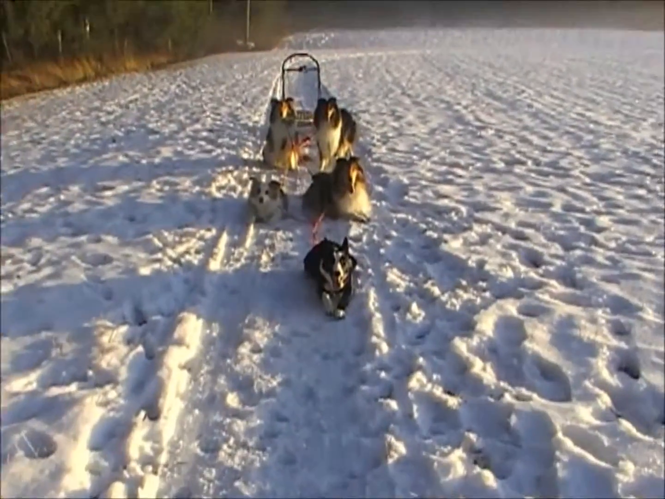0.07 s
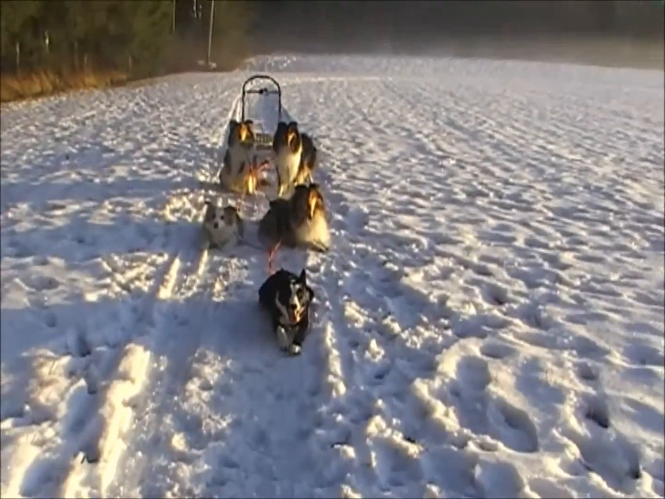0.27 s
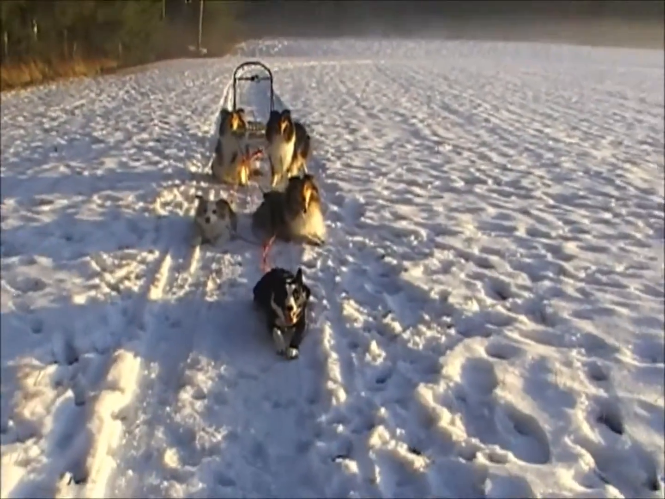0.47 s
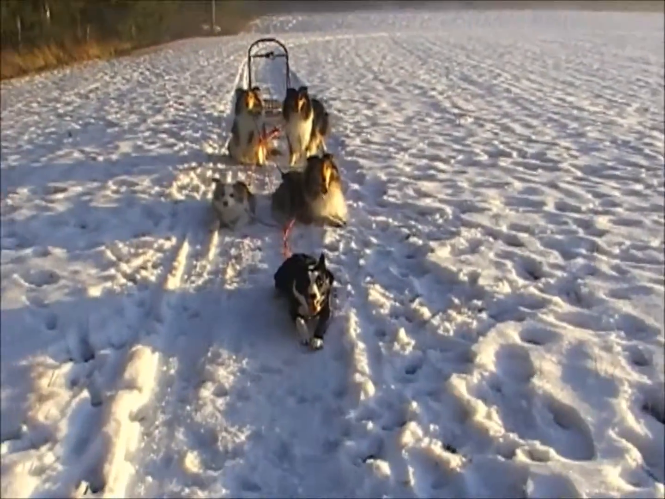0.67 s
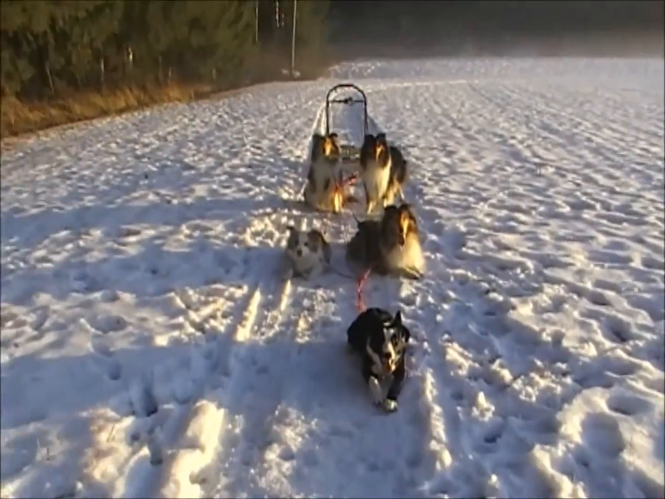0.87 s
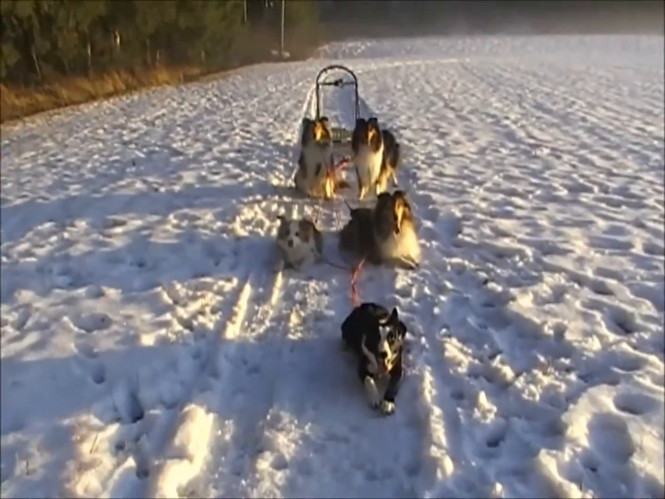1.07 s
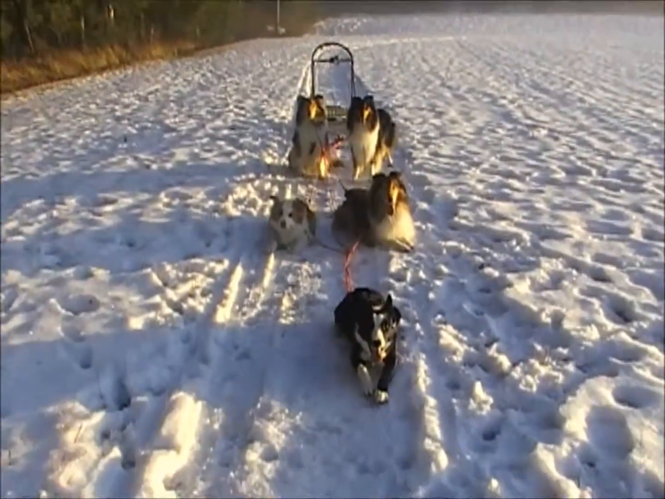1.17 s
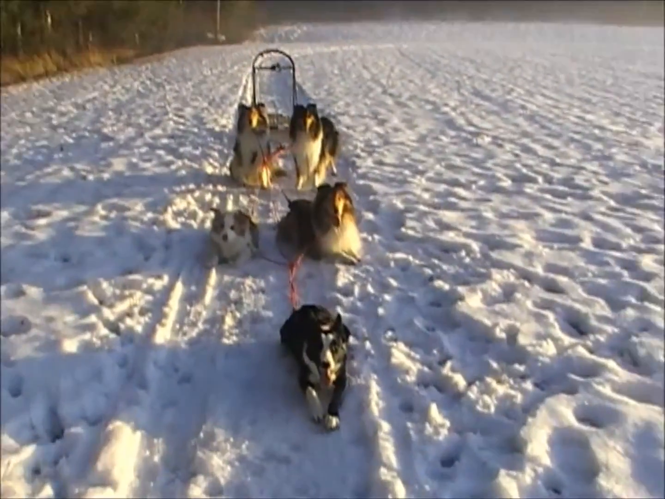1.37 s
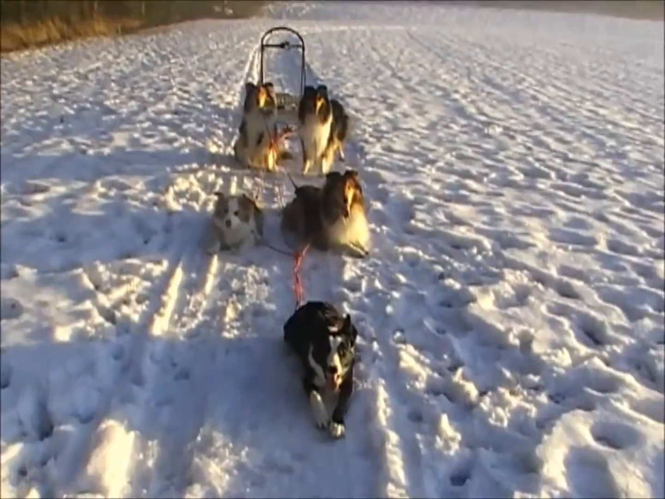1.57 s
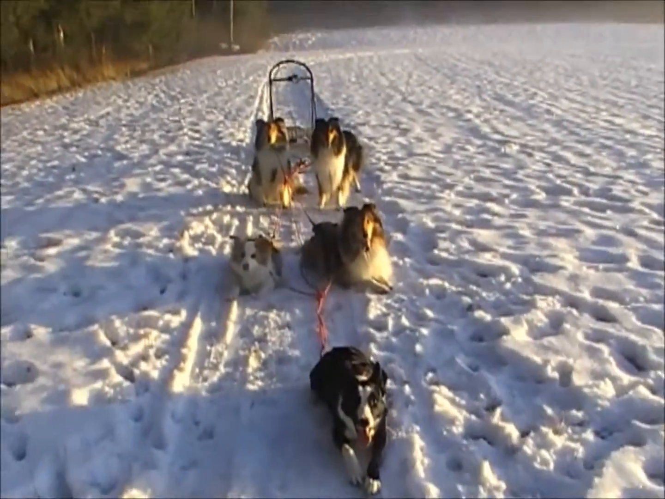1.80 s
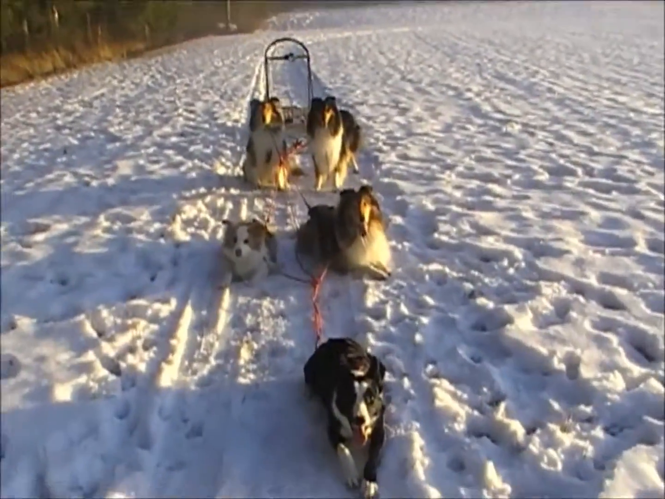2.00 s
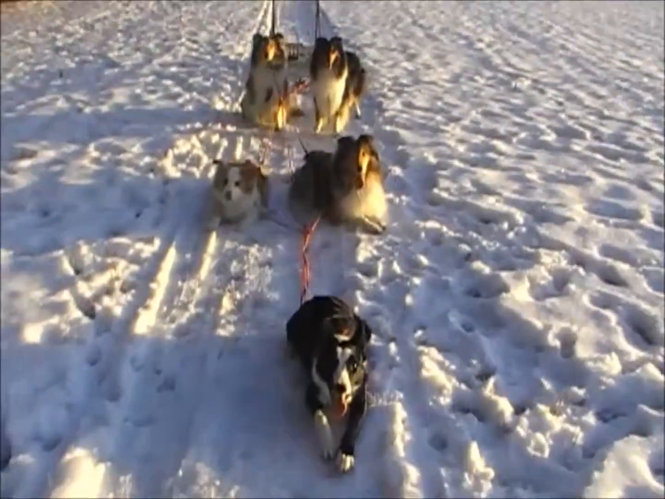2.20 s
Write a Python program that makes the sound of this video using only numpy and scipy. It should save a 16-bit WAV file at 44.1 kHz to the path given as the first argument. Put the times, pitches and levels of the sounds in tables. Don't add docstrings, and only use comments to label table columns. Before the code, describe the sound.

Crisp, crackling footsteps on frozen snow, with sharp plastic clicks and strap rubbing close to the microphone.

```python
import sys
import numpy as np
from scipy import signal
from scipy.fft import rfft, irfft, next_fast_len
from scipy.io import wavfile
from scipy.ndimage import map_coordinates

SR = 44100
rng = np.random.default_rng(int(sys.argv[2]) if len(sys.argv) > 2 else 0)


def voltage_ratio(level):
    return 10 ** (np.asarray(level, float) / 20)


def transcribe(u):
    v = np.clip(np.atleast_2d(u).T, -1, 1)
    q = np.round(v * 32767).astype(np.int16)
    wavfile.write(sys.argv[1], SR, q)


N = 99180
SIDE = np.array([[1.0], [-1.0]])

# (frequency [Hz], density [dB per Hz])
HUSH_SPECTRUM = [(59, -48), (100, -6.5), (255, 6), (836, 0), (3320, -9), (10200, -17), (12100, -29),
                 (15000, -38)]
HUSH_DB, HUSH_CORRELATION, HUSH_SWAY_DB = -50, 0.52, 1.2
# (frequency [Hz], density [dB per Hz])
WIND_SPECTRUM = [(20, -24.5), (100, -12.5), (300, -21.5), (600, -80)]
WIND_DB, GUST_DB, GUST_POINTS_PER_S = -55.5, 7, 9
# (frequency [Hz], gain [dB])
MIC_RESPONSE = [(60, -8.5), (200, -1.5), (9500, 2.5), (11500, -7.5), (14000, -18)]

# (start [s], rise [s], hold [s], level [dB], powder above crumbs [dB])
BOOT_LOADS = [(-.02, 0.038, 0.0025, -58.5, 17.5), (0.07, 0.011, 0.039, -64.5, -13),
              (0.098, 0.069, 0.057, -50, 4), (0.216, 0.031, 0.063, -36, 4), (0.312, 0.0056, 0.11, -44.5, 1),
              (0.433, 0.034, 0.025, -45.5, 3), (0.546, 0.013, 0.079, -46, 3), (0.643, .02, 0.068, -58, 1.5),
              (0.769, 0.0021, 0.003, -36.5, -1), (0.833, 0.045, 0.1, -40, -1.5),
              (1.188, 0.031, 0.085, -45.5, 6.5), (1.366, 0.0053, 0.083, -46.5, 10.5),
              (1.469, 0.026, 0.037, -40.5, 0.5), (1.53, 0.021, 0.063, -37, 2),
              (1.996, 0.0032, 0.0075, -34.5, 3.5), (2.01, 0.016, .16, -40, 1.5)]
RELEASE_S = 0.008
CRUMBS = dict(rate=900, hz=700, octaves=0.89, cycles=0.94, spread_db=3, size=500)
POWDER = dict(rate=5000, hz=4700, octaves=0.8, cycles=0.57, spread_db=3.5, size=60)
POWDER_DB = -9
BIGGEST_SPREADS, DEEP_HZ = 2.2, 500
# (time [s],
# peak level [dB], pitch [Hz], length [cycles])
PLATE_POPS = [(0.0169, -38, 557, 1.6), (0.0477, -34, 660, 0.93), (0.077, -39, 1590, 3.4),
              (0.0824, -27, 1190, 0.71), (0.1003, -33, 450, 1.3), (0.2096, -26.5, 1270, 0.68),
              (0.2335, -28, 586, 2.7), (0.2398, -36, 690, 0.9), (0.2441, -25, 607, 1.9),
              (0.2482, -25, 1800, .8), (0.2531, -15, 1490, 0.58), (0.2558, -21, 2600, 1.1),
              (0.2652, -31, 2090, 1.1), (0.2703, -21.5, 420, 1.4), (0.2716, -19, 1140, 0.82),
              (0.2793, -16.5, 2580, 0.4), (0.2842, -14.5, 750, 1), (0.2872, -21, 2300, 0.7),
              (0.2889, -21, 648, 2.9), (0.2946, -19.5, 890, 1.4), (0.3023, -19, 1320, 2),
              (0.3083, -18.5, 680, 1.5), (0.3237, -31, 806, 1.8), (0.3298, -28, 2320, 0.98),
              (0.341, -25, 880, 1.4), (0.4645, -38, 780, 1.3), (0.4718, -35, 450, 0.75),
              (0.4789, -24.5, 1080, 0.72), (0.4888, -25.5, 1000, 0.6), (0.5206, -22.5, 940, 0.72),
              (0.5705, -32.5, 596, 1.1), (0.5861, -28, 630, 0.7), (0.5977, -30.5, 980, 1.4),
              (0.6, -32, 1610, 3.9), (0.608, -53, 3000, 3), (0.6185, -38, 2520, 3.6),
              (0.7564, -46, 1100, 0.91), (0.7726, -21, 1380, 1), (0.7735, -32.5, 276, 1.8),
              (0.8534, -21, 600, 0.73), (0.8824, -21.5, 1340, 0.73), (0.9043, -19, 900, 1.7),
              (0.9179, -17.5, 1420, 0.93), (0.9697, -16, 1350, 0.99), (0.9849, -29.5, 1420, 1.2),
              (1.0124, -32.5, 1360, 1.5),
              (1.0813, -26.5, 3100, 1.34), (1.1645, -33.5, 2340, 1.2), (1.4057, -32.5, 2110, 2.6),
                   (1.5117, -25, 1880, 1.5), (1.5426, -34, 2000, 1.8), (1.5829, -26, 4830, 5.5),
                   (1.8536, -15, 1930, 0.69), (1.567, -27, 374, 1.7), (1.5815, -25.5, 390, 1.9),
                   (0.2865, -31.5, 300, 2), (0.7305, -36.5, 1990, 2.2), (0.7315, -44, 3130, 12),
                   (1.2279, -30, 770, 1.8), (1.3772, -26, 870, 1.1), (1.4377, -40, 825, 5.1),
                   (1.4745, -33, 570, 1.6), (1.4935, -35, 554, 1.6), (1.5126, -29.5, 690.0, 3.1),
                   (1.5434, -24, 463, 0.72), (1.585, -29.5, 866, 10), (1.9578, -33.5, 2070, 1.8),
                   (2.0034, -17.5, 590, 0.3), (2.1721, -21.5, 1030, 1.03), (2.1835, -45, 960.0, 2.8)]
# (time [s], peak level [dB], pitch [Hz], length
SNOW_SQUEAKS = [
    (.454, -48, 3550, 24),
    (.4665, -45, 3380, 22),
    (.616, -31, 1250, 5),
    (.630, -31, 1500, 6),
    (.622, -33, 2200, 4),
    (.8325, -27, 1120, 3.5),
]
SNOW_LEFT_DB, SNOW_SCATTER_DB = 1.6, -19
# (frequency [Hz], width [Hz], level [dB])
PORT_MODES = [(10700, 990, 3)]

# (time [s], shell peak [dB], hollow above shell [dB], sharpness [-1 dull to 1 thin], decay [s])
BUCKLE_TAPS = [(0.5646, -38, -23, 0.23, 0.0016), (0.5665, -38.5, 1, .6, 0.0012),
               (0.731, -34, -5, -0.12, 0.0013), (0.7775, -35.5, -13, -0.09, 0.0012),
               (0.8317, -33.5, -12, 0.84, 0.0009), (0.883, -31, -20, 0.45, .0015),
               (1.0817, -36, 8, 0.075, 0.0017), (1.096, -35, 6, -0.44, .0015),
               (1.1735, -39.5, 4, -0.38, 0.0013), (1.3144, -27, 8, 0.51, .001),
               (1.3184, -22, -4, 0.34, 0.0012), (1.3201, -25.5, 6.5, 0.79, 0.0011),
               (1.322, -34, 17, .1, .0008), (1.3237, -21, 0, 0.27, 0.0013), (1.5794, -35, 11, 0.02, 0.0011),
               (1.8532, -10, -16, 0.8, 0.0014), (1.857, -18, -2, 0.44, 0.00083),
               (1.8762, -24.5, -5, 0.87, 0.00077), (1.912, -38, -4, 0.27, 0.00083),
               (2.0933, -11.5, -9, 0.19, 0.0013), (2.1134, -23, -4, -0.38, 0.0019)]
TAP_DB, THUMP_DB, CRACK_DB, ROCK_DB = 9.5, 32.5, -20.5, 5
THUMP = np.hanning(30) / 14
# (start [s], rise [s], hold [s], hollow level [dB], shell level [dB])
STRAP_RUBS = [(0.814, 0.0058, 0.19, -46.5, -58),  (1.033, 0.046, 0.036, -42.5, -45.5),
              (1.111, 0.019, 0.14, -47.5, -52.5), (1.31, 0.0052, 0.01, -26, -36),
              (1.332, 0.0036, 0.044, -47.5, -60), (1.406, 0.0047, 0.014, -49, -49.5),
              (1.542, 0.026, 0.053, -42.5, -49), (1.61, 0.032, 0.064, -35.5, -42.5),
              (1.679, 0.017, 0.0048, -26.5, -43), (1.699, 0.0031, 0.076, -45.5, -45),
              (1.803, 0.022, 0.031, -41.5, -46.5), (1.849, 0.0013, 0.028, -31.5, -53),
              (1.889, 0.0098, 0.0036, -36, -38.5), (1.916, 0.018, 0.034, -52, -54),
              (2.041, 0.0084, 0.0049, -29.5, -42.5), (2.078, 0.009, 0.0034, -39, -58),
              (2.112, 0.0059, 0.024, -29.5, -41.5), (2.16, .004, 0.046, -47.5, -53.5)]
SLIPS_PER_S, SLIP_SPREAD_DB, RUB_HOLLOW_DB, RUB_SHELL_DB = 6000, 3, 16.5, 10
# (time [s], peak level [dB], pitch [Hz], length [cycles])
HAND_JOLTS = [
    (1.311, -21, 109, 0.9),
    (1.316, -27, 236, 4),
    (1.318, -17.5, 690, 5.4),
    (1.695, -29, 69, 0.83),
    (1.89, -30.5, 61.5, 2.6),
]
JOLT_SHARED = -0.3
# (time [s], peak level [dB], pitch [Hz], length [cycles])
HOLLOW_KNOCKS = [
    (1.3178, -14, 760, 1.3),
    (1.8562, -18, 800, 1.6),
    (2.0852, -25, 880, 3),
    (2.0926, -12, 920, 3.6),
    (2.1147, -19, 880, 5),
]
# (frequency [Hz], width [Hz], level [dB])
HOLLOW_MODES = [(300, 300, -12), (870, 130, 1)]
# (frequency [Hz], width [Hz], level [dB])
ROCKING_MODES = [(350, 400, -14), (1050, 260, -3)]
# (frequency [Hz], width [Hz], level [dB])
SHELL_MODES = [(2790, 570, -1.5), (4324, 274, -1), (5386, 480, -1), (8430, 2000, -5.5), (9450, 6600, -11.5)]
# (frequency [Hz], width [Hz], level [dB])
EDGE_MODES = [(2070, 1330, -12), (9500, 2300, -15), (11700, 5700, -18)]
RIGHT_LEADS_S, STRAP_RIGHT_DB, SHELL_OWN_DB = 0.0001, 3, 6


def unit(x):
    return x / np.sqrt(np.mean(x ** 2) + 1e-20)


def along(points, hz):
    f, level = np.transpose(points)
    return np.interp(np.log(hz + 1), np.log(f + 1), level)


def filtered(x, response):
    m = next_fast_len(N + SR // 2)
    return irfft(rfft(x, m) * response(np.fft.rfftfreq(m, 1 / SR)), m)[..., :N]


def air():
    noise = rng.standard_normal((2, N))
    a, b = filtered(noise, lambda hz: voltage_ratio(along(HUSH_SPECTRUM, hz) - along(MIC_RESPONSE, hz)))
    angle = np.arccos(HUSH_CORRELATION) / 2
    hush = unit(np.cos(angle) * a + np.sin(angle) * b * SIDE)
    at = np.arange(N) * GUST_POINTS_PER_S / SR
    gust = np.array([map_coordinates(k, [at]) for k in rng.standard_normal((3, 30))])
    turbulence = filtered(rng.standard_normal((2, N)), lambda hz: voltage_ratio(along(WIND_SPECTRUM, hz)))
    wind = unit(turbulence * voltage_ratio(GUST_DB * gust[:2]))
    return voltage_ratio(HUSH_DB + HUSH_SWAY_DB * gust[2]) * hush + voltage_ratio(WIND_DB) * wind


def strokes(start, rise, hold, db):
    t = np.arange(N) / SR - start[:, None]
    rise, end = rise[:, None] + 1e-4, (rise + hold)[:, None]
    attack = np.clip(t / rise, 0, 1)
    decay = np.exp(-np.clip(t - end, 0, None) / RELEASE_S)
    return np.sqrt((voltage_ratio(db) ** 2) @ (attack * decay) ** 2)


def grains(s, gain, hz, cycles, size):
    phase = hz[:, None] * np.arange(size) / SR
    u = 2.62 * phase / cycles[:, None]
    wave = gain[:, None] * u * np.exp(1 - u) * np.sin(2 * np.pi * phase)
    at = np.clip(np.round(s * SR).astype(int)[:, None] + np.arange(size), 0, N)
    return np.bincount(at.ravel(), wave.ravel(), N + 1)[:N]


def crackle(rate, hz, octaves, cycles, spread_db, size):
    draw, lean = rng.random((12000, 3)), rng.standard_normal(12000)
    s = np.cumsum(-np.log(1 - draw[:, 0])) / rate
    keep = s < N / SR
    pitch = np.clip(hz * 2 ** (octaves * lean), 150, 12000)
    spreads = np.minimum(-np.log(1 - draw[:, 1]), BIGGEST_SPREADS)
    sign = np.sign(draw[:, 2] - 0.5)
    gain = voltage_ratio(spread_db * spreads) * sign * np.minimum(pitch / DEEP_HZ, 1) ** 2
    return unit(grains(s[keep], gain[keep], pitch[keep], np.full(keep.sum(), cycles), size))


def crushed_crust():
    start, rise, hold, db, fizz_db = np.transpose(BOOT_LOADS)
    crumbs = strokes(start, rise, hold, db) * crackle(**CRUMBS)
    powder = strokes(start, rise, hold, db + fizz_db + POWDER_DB) * crackle(**POWDER)
    return crumbs + powder


def breaking_plates():
    s, peak_db, hz, cycles = np.transpose([*PLATE_POPS, *SNOW_SQUEAKS])
    return grains(s, -voltage_ratio(peak_db), hz, cycles, size=1200)


def snow():
    crush = crushed_crust() + breaking_plates()
    fade = voltage_ratio(-60 * np.arange(900) / 900)
    tails = [unit(n * fade) / 30 for n in rng.standard_normal((2, 900))]
    scatter = np.array([signal.fftconvolve(crush, tail)[:N] for tail in tails])
    direct = crush * voltage_ratio(SIDE * SNOW_LEFT_DB / 2)
    cavities = filtered(crush, modes(PORT_MODES)) * SIDE
    return direct + voltage_ratio(SNOW_SCATTER_DB) * scatter + cavities


def modes(table):
    def resonance(f, c, width, db):
        return voltage_ratio(db) * 1j * f * width / (c * c - f * f + 1j * f * width + 1e-9)
    return lambda f: sum((-1) ** k * resonance(f, *mode) for k, mode in enumerate(table))


def buckle_taps():
    push, contact, crack = np.zeros((2, N)), np.zeros((2, N)), np.zeros(N)
    t = np.arange(256) / SR
    for s, db, low_db, sharp, length in BUCKLE_TAPS:
        i = round(s * SR)
        n = rng.standard_normal((3, 256))
        n = n - sharp * np.roll(n, 1, axis=1) - sharp * np.roll(n, 2, axis=1) / 2
        burst = n * np.exp(-t / length)
        contact[:, i:i + 256] += voltage_ratio(db + TAP_DB) * burst[:2]
        crack[i:i + 256] += voltage_ratio(db + TAP_DB + CRACK_DB) * burst[2]
        push[0, i + 30:i + 60] += voltage_ratio(db + low_db + THUMP_DB) * THUMP
        push[1, i + 40:i + 70] += voltage_ratio(db + low_db + THUMP_DB + ROCK_DB) * THUMP
    return push, contact, crack


def strap_rubs():
    start, rise, hold, hollow_db, shell_db = np.transpose(STRAP_RUBS)
    slips = (rng.random((3, N)) < SLIPS_PER_S / SR) * rng.standard_normal((3, N))
    slips = slips * voltage_ratio(SLIP_SPREAD_DB * rng.standard_normal((3, N)))
    slips = slips / np.std(slips)
    push = slips[:2] * strokes(start, rise, hold, hollow_db + RUB_HOLLOW_DB)
    contact = slips[1:] * strokes(start, rise, hold, shell_db + RUB_SHELL_DB)
    return push, contact


def hand_jolts():
    s, db, hz, cycles = np.transpose(HAND_JOLTS)
    return (SIDE + JOLT_SHARED) * grains(s, voltage_ratio(db), hz, cycles, size=2000)


def hollow_knocks():
    s, db, hz, cycles = np.transpose(HOLLOW_KNOCKS)
    return grains(s, voltage_ratio(db), hz, cycles, size=1200)


def strap():
    tap_push, tap_contact, crack = buckle_taps()
    rub_push, rub_contact = strap_rubs()
    push, contact = tap_push + rub_push, tap_contact + rub_contact
    hollow = filtered(push[0], modes(HOLLOW_MODES)) - SIDE * filtered(push[1], modes(ROCKING_MODES))
    hollow = hollow - hollow_knocks()
    edge = filtered(contact[0] + voltage_ratio(SHELL_OWN_DB) * contact[1], modes(EDGE_MODES))
    shell = crack + filtered(contact[0], modes(SHELL_MODES)) + SIDE * edge
    balance = voltage_ratio(-SIDE * STRAP_RIGHT_DB / 2)
    lead = lambda hz: balance * np.exp(-1j * SIDE * np.pi * hz * RIGHT_LEADS_S)
    return filtered(hollow, lead) + hand_jolts() + shell * balance


def scene():
    return air() + snow() + strap()


def low_pass(x):
    return signal.sosfilt(signal.butter(12, 16620, fs=SR, output="sos"), x)


def record(dry):
    top_hz = 16620
    heard = filtered(dry, lambda hz: voltage_ratio(along(MIC_RESPONSE, hz)) * (hz < top_hz))
    return low_pass(heard)


dry = scene()
out = record(dry)
transcribe(out)
```